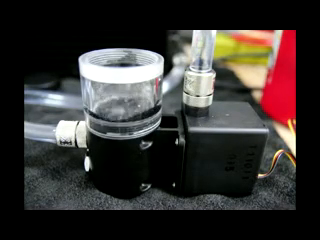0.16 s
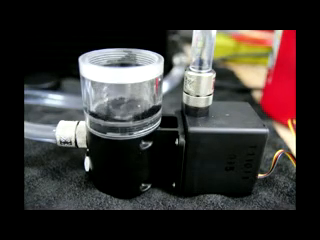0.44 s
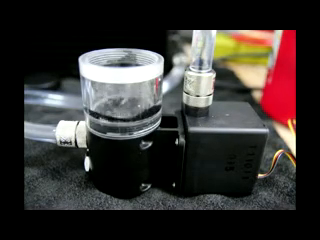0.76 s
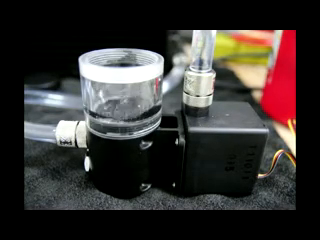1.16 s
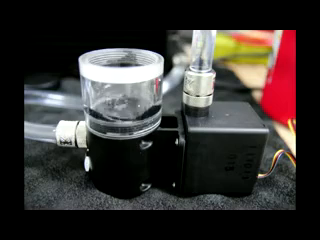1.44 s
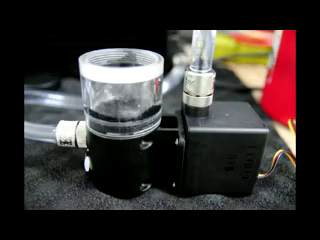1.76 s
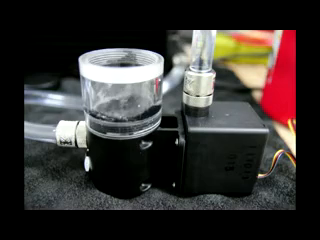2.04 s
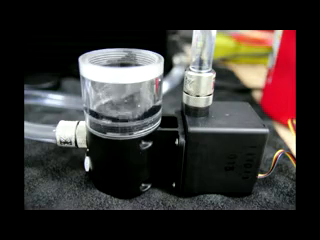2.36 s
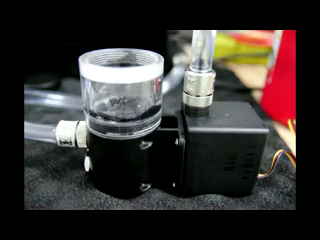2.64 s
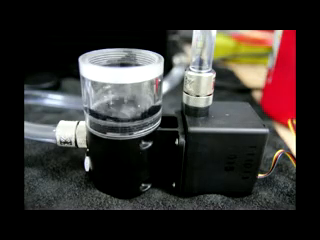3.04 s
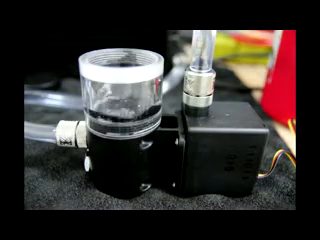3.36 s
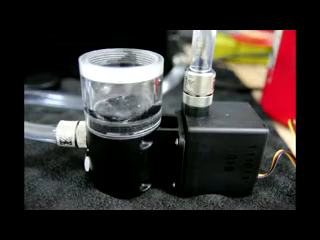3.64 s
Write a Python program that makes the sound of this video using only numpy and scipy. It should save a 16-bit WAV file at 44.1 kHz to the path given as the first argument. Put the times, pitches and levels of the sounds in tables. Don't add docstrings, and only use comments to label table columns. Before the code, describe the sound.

Close, slightly dull and gritty pickup of a small pump's constant low buzz and water flow indoors; one bright bubble pop opens it, small bubble clicks come later, mostly around 2.3 to 2.7 seconds.

```python
import sys
import numpy as np
from scipy import signal
from scipy.fft import rfft, irfft
from scipy.io import wavfile
from scipy.ndimage import uniform_filter1d

SR = 44100
rng = np.random.default_rng(int(sys.argv[2]) if len(sys.argv) > 2 else 0)


def ratio_of_db(decibels):
    return 10 ** (np.asarray(decibels, float) / 20)


def materialize(psi):
    bounded = np.clip(np.atleast_2d(psi).T, -1, 1)
    quanta = np.round(bounded * 32767).astype(np.int16)
    wavfile.write(sys.argv[1], SR, quanta)


N = 168021

# [shaft order, level/dB]
SHAFT_ORDERS = [(1.0, -40.5), (3.0, -31.5), (5.0, -39), (6.0, -35.5), (7.0, -45.5), (8.0, -49.5),
                (10.0, -56.5), (14.0, -55.5), (16.0, -63), (17.0, -61.5), (20.0, -50.5), (26.0, -59.5),
                (30.0, -63), (31.0, -63.5), (33.0, -64.5), (34.0, -62), (40.0, -70.5), (62.0, -68),
                (68.0, -70), (69.0, -78), (70.0, -78), (71.0, -75.5), (72.0, -77.5), (73.0, -76.5),
                (75.0, -77.5), (76.0, -80), (81.0, -84), (82.0, -72.5), (89.0, -86.5), (91.0, -86.5)]
SHAFT_HZ, WANDER_TURNS = 58.82, 0.0013
WOBBLE_HZ, WOBBLE_DEPTH = 1.6, 0.3

# [offset/steps of the beat rate, level/dB]
BEATING_TONES = [(0, -38), (-1, -45), (-2, -44)]
BEAT_TONE_HZ, BEATS_PER_S, BEAT_PEAK_S = 240.9, 2.82, 1.835

# [f/Hz, level/dB, pitch waver/Hz]
FAN_LINES = [(120.45, -46, .05), (248.8, -50, .3), (168.2, -49, .3), (299.7, -47, .15), (479.5, -54, 2)]

# [t/s, peak level/dB, f/Hz, ring t60/s]
BUBBLE_POPS = [(-.0012, -18.5, 2860, .019), (.0105, -34, 2880, .04), (.020, -36, 2850, .05),
               (.5955, -35, 3150, .022), (.5985, -32, 3280, .035), (.6045, -38, 3240, .03),
               (.798, -39, 3500, .016), (2.2815, -46, 5160, .03), (2.2965, -36, 2160, .03),
               (2.330, -38, 2050, .025), (2.482, -36, 2500, .018), (2.5015, -35, 2070, .035),
               (2.514, -42, 3750, .025), (1.869, -39, 2530, .025), (3.219, -37, 2530, .025),
               (2.483, -38, 3200, .018), (2.504, -40, 2900, .03), (2.575, -41, 2500, .04),
               (2.683, -39, 3470, .03)]
BUBBLE_RISE_S, BUBBLE_GLIDE_PER_S = 0.00053, 0.67
FIZZ_PER_S, FIZZ_DB, FIZZ_SPREAD_DB = 250, -59, 2.5

# [start t/s, end t/s, start f/Hz, drift/(Hz/s), level/dB]
WHINE_TONES = [
    (1.4, 2.1, 4882, 25, -72),
    (2.2, 4.1, 4890, 12, -68),
    (2.15, 3.25, 5122, 14, -71),
    (1.4, 2.0, 5106, 20, -73),
    (-.2, 1.3, 4958, 3, -74),
    (2.1, 3.1, 4972, 6, -74),
    (2.6, 4.0, 5282, 10, -78),
]
WHINE_FADE_S, WHINE_FLUTTER_DB = 0.14, 2.5

# [f/Hz, level/dB per Hz]
RUSH_SPECTRUM = [(410, -38), (700, 0), (825, -1.5), (997, -2.5), (1170, -4.5), (1280, -7), (2550, -11),
                 (4920, -25), (5500, -30), (7150, -59), (12100, -120)]
# [f/Hz, width/Hz, lift (negative: dip)/dB]
TANK_MODES = [(770, 76, 2.5), (676, 19, -3), (725, 33, 0), (1102, 16, -3), (1118, 33, 5), (1223, 73, 3),
              (1348, 68, 4), (1502, 68, 3.5), (1493, 14, -5.5), (1670, 100, 1.5), (2560, 370, 1),
              (5200, 190, -0.5)]
RUSH_DB = -37

# [f/Hz, level/dB per Hz]
RUMBLE_SPECTRUM = [(12, -36.5), (24, -9), (55, -6), (150, -2), (260, 0.5), (520, -2.5), (570, -7.5),
                   (720, -17)]
# [f/Hz, width/Hz, lift (negative:
# dip)/dB]
ROOM_MODES = [(44, 5, 3), (67.5, 11, 10), (105, 12, 6), (155, 5.5, -4), (167.7, 6.2, 7), (193.3, 12, 4.5),
              (219, 6.9, -2.5), (238, 8, -3), (352, 8, -2.5), (421, 11, -3), (430, 15, 1.5),
              (464, 13.2, 7.5), (508.8, 14, 6), (534, 14, 3.5), (582, 5.1, 3), (632.5, 28, 3.5)]
RUMBLE_DB = -27.5

# [t/s, level/dB]
CONVERTER_TICKS = [
    (1.0921, -53),
    (3.4561, -51),
    (1.4707, -62),
    (1.3665, -65),
    (1.1315, -65),
]
SLOWDOWN = 4
MIRROR_DB_PER_KHZ = -13.5
STOP_HZ, STOP_DB_PER_KHZ = 9500, -11.5
HISS_DB, HISS_TOP_HZ, HISS_ABOVE_DB = -87.5, 13100, -13
OPENING_S, CLOSING_S = 0.0001, 0.001


def rotor():
    t = np.arange(N) / SR
    turns = SHAFT_HZ * t + WANDER_TURNS * slow(1.6, count=1)[0]
    drift = slow(1.1, count=4)
    out = np.zeros(N)
    for i, (order, db) in enumerate(SHAFT_ORDERS):
        phase, wobble_phase = 2 * np.pi * rng.random(2)
        depth = WOBBLE_DEPTH * (order > 40)
        wobble = 1 + depth * np.sin(2 * np.pi * WOBBLE_HZ * t + wobble_phase)
        level = ratio_of_db(db + 2.5 + 0.59 * drift[i % 4])
        out += level * wobble * np.sin(2 * np.pi * order * turns + phase)
    return out


def throb():
    t = np.arange(N) / SR - BEAT_PEAK_S
    out = np.zeros(N)
    for step, db in BEATING_TONES:
        hz = BEAT_TONE_HZ + step * BEATS_PER_S
        out += ratio_of_db(db) * np.sqrt(2) * np.cos(2 * np.pi * hz * t)
    return out


def fan():
    out = np.zeros(N)
    for (hz, db, width), drift in zip(FAN_LINES, slow(1.15, count=len(FAN_LINES))):
        turns = np.cumsum(hz + width * drift) / SR + rng.random()
        out += ratio_of_db(db + 3.0) * np.sin(2 * np.pi * turns)
    return out


def bubble(hz, t60, glide):
    t = np.arange(4000) / SR
    envelope = np.minimum(t / BUBBLE_RISE_S, 1) * ratio_of_db(-60 * t / t60)
    return envelope * np.sin(2 * np.pi * hz * t * (1 + glide * t))


def bubbles():
    lead = 1000
    pops = np.zeros(N + 5000)
    for s, db, hz, t60 in BUBBLE_POPS:
        start = round(s * SR) + lead
        pops[start:start + 4000] += ratio_of_db(db) * bubble(hz, t60, BUBBLE_GLIDE_PER_S)
    births = rng.random(N) < FIZZ_PER_S / SR
    strength = births * ratio_of_db(FIZZ_SPREAD_DB * np.minimum(rng.exponential(1, N), 5))
    kind = rng.integers(0, 24, N)
    fizz = np.zeros(N)
    for k, hz in enumerate(np.geomspace(1500, 5200, 24)):
        ring = bubble(hz, 90 / hz, 8 * rng.random()) * (1500 / hz) ** 1.5
        fizz += signal.oaconvolve(strength * (kind == k), ring)[:N]
    return pops[lead:N + lead] + ratio_of_db(FIZZ_DB) * evened(fizz)


def whines():
    t = np.arange(N) / SR
    out = np.zeros(N)
    for (start, end, hz, rise, db), flutter in zip(WHINE_TONES, slow(7.1, count=len(WHINE_TONES))):
        fade = np.clip(np.minimum(t - start, end - t) / WHINE_FADE_S, 0, 1)
        level = ratio_of_db(db + 3.5 + WHINE_FLUTTER_DB * flutter)
        turns = hz * (t - start) + rise * (t - start) ** 2 / 2
        out += fade * level * np.sin(2 * np.pi * turns)
    return out


def water_rush():
    return ratio_of_db(RUSH_DB) * noise(RUSH_SPECTRUM, TANK_MODES, patchy_db=0.57, swell_db=-0.12,
                                ripple_db=1.5, size=4096)


def air_rumble():
    return ratio_of_db(RUMBLE_DB) * noise(RUMBLE_SPECTRUM, ROOM_MODES, patchy_db=0.93, swell_db=1.0,
                                  ripple_db=1.16, size=8192)


def noise(points, humps, patchy_db, swell_db, ripple_db, size):
    hop = size // 4
    frames, hz = N // hop + 5, np.fft.rfftfreq(size, 1 / SR)
    f, db = np.transpose(points)
    shape = np.interp(np.log(hz + 1), np.log(f + 1), db, right=-120)
    for at, width, lift in humps:
        shape = shape + lift * np.exp(-((hz - at) / width) ** 2 * 2)
    shape = shape + ripple_db * evened(rng.standard_normal(len(hz)))
    real, imag, patches = rng.standard_normal((frames, len(hz), 3)).T
    patches = uniform_filter1d(patches, size=12, axis=0)
    patches = evened(uniform_filter1d(patches, size=5, axis=1))
    swell = evened(uniform_filter1d(rng.standard_normal(frames), size=4))
    level = ratio_of_db(shape[:, None] + patchy_db * patches + swell_db * swell)
    z = (real + 1j * imag) * level
    return evened(signal.istft(z, nperseg=size, noverlap=size - hop)[1][:N])


def slow(rate_hz, count):
    z = rfft(rng.standard_normal((count, N)))
    x = irfft(z / (1 + (np.fft.rfftfreq(N, 1 / SR) / rate_hz) ** 2), N)
    return x / x.std(axis=1, keepdims=True)


def evened(x):
    return x / np.sqrt(np.mean(x ** 2) + 1e-20)


def scene():
    pump = rotor() + throb()
    tank = bubbles() + water_rush()
    room = fan() + whines() + air_rumble()
    return (pump + tank + room)[None]


def band_limit(x):
    return signal.sosfilt(signal.butter(12, 16000, fs=SR, output="sos"), x)


def record(dry):
    margin = 2048
    total = N + 2 * margin
    hz, half_hz = np.fft.rfftfreq(total, 1 / SR), SR / SLOWDOWN / 2
    padded = np.pad(dry, ((0, 0), (margin, margin)), "reflect")
    limited = irfft(rfft(padded) * (hz < half_hz), total)
    sampled = limited * SLOWDOWN * (np.arange(total) % SLOWDOWN == 0)
    mirror_db = MIRROR_DB_PER_KHZ * np.maximum(hz - half_hz, 0) / 1000
    stop_db = STOP_DB_PER_KHZ * np.maximum(hz - STOP_HZ, 0) / 1000
    rebuilt = irfft(rfft(sampled) * ratio_of_db(mirror_db + stop_db), total)[:, margin:-margin]
    t = np.arange(N) / SR
    opening = np.minimum(t / OPENING_S + 0.7, 1)
    closing = np.minimum(t[::-1] / CLOSING_S + 0.08, 1)
    mix = rebuilt * closing * opening
    hiss_level = ratio_of_db(HISS_DB + HISS_ABOVE_DB * (hz > HISS_TOP_HZ))
    mix = mix + irfft(rfft(rng.standard_normal(padded.shape)) * hiss_level, total)[:, :N]
    for s, db in CONVERTER_TICKS:
        mix[:, round(s * SR)] += ratio_of_db(db)
    return band_limit(mix)


dry = scene()
out = record(dry)
materialize(out)
```